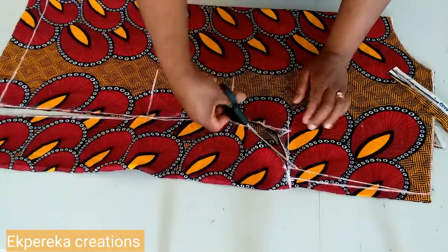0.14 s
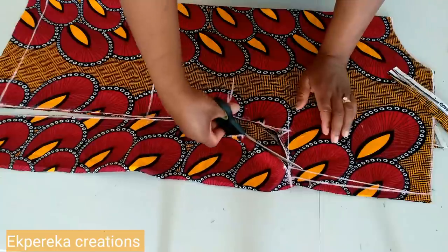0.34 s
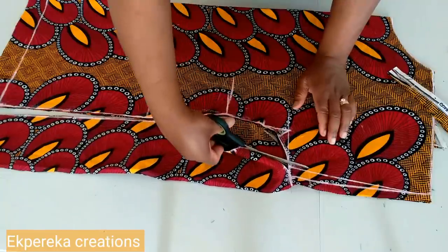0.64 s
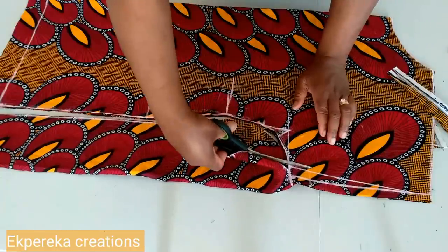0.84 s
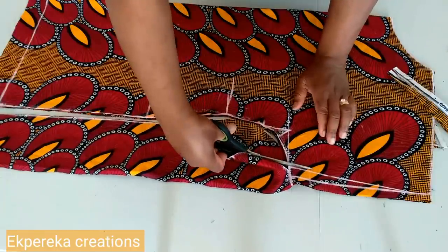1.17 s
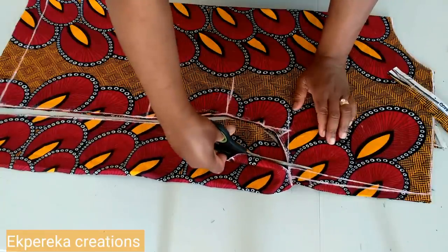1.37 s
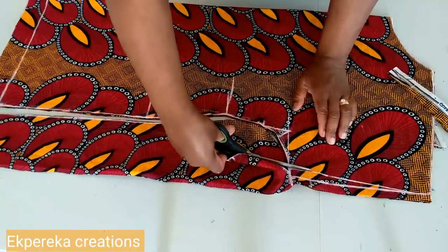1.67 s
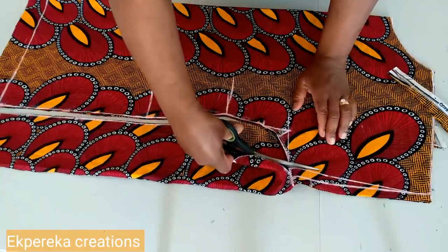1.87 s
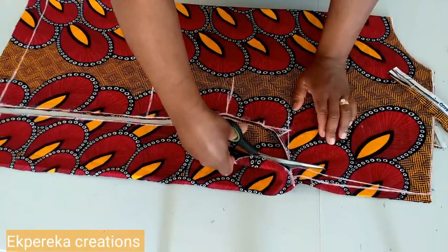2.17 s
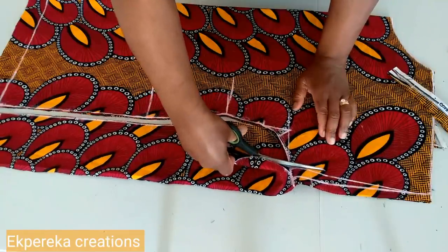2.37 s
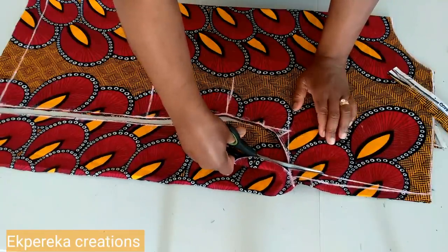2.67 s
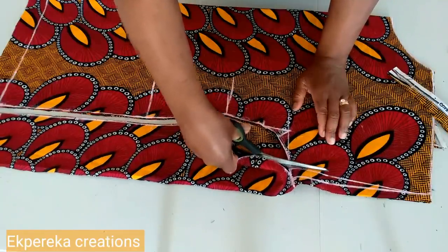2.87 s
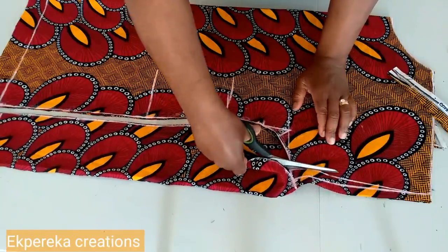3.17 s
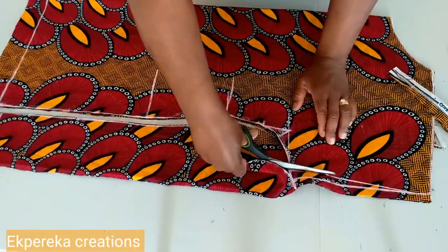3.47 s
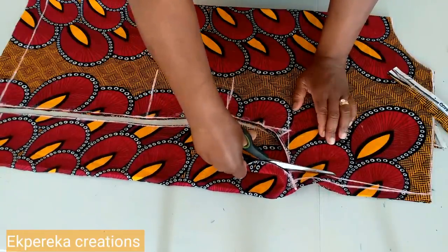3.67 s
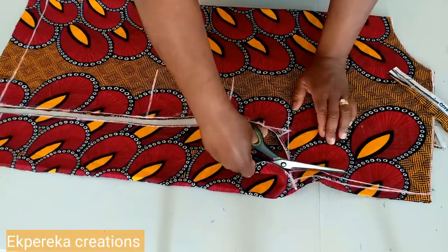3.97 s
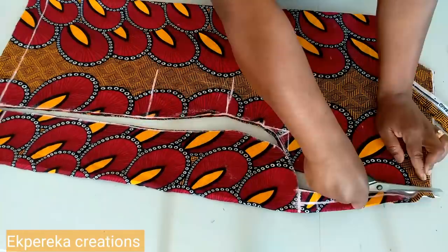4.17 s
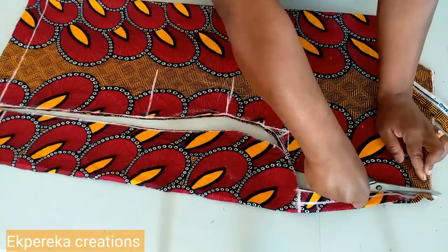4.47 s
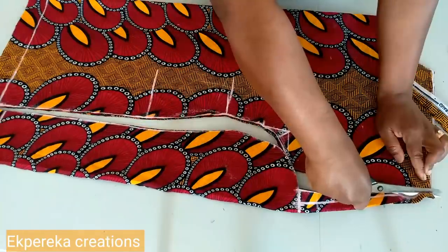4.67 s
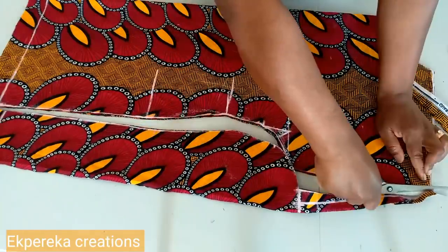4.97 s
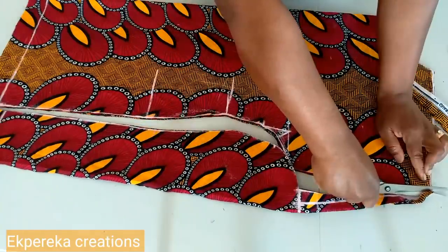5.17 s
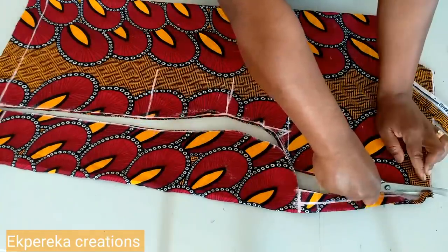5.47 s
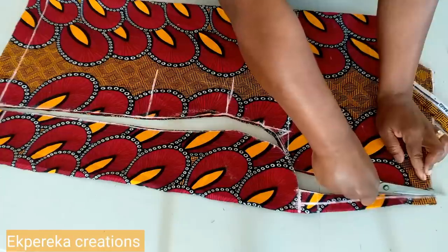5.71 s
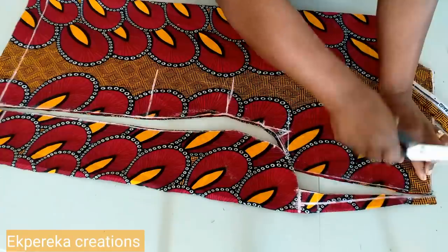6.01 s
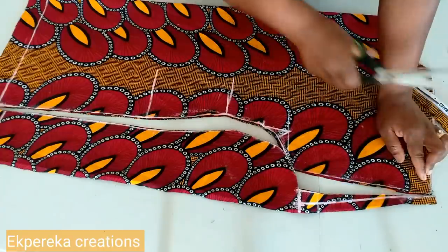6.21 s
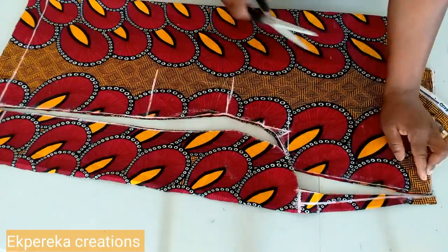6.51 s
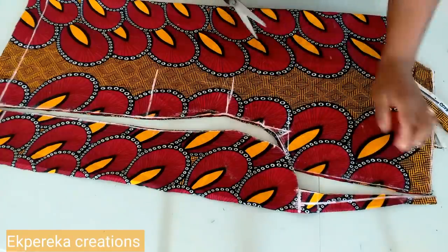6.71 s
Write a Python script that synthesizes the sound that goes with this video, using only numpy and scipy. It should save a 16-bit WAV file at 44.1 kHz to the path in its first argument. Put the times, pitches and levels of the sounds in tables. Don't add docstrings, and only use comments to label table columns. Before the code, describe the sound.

A close microphone in a bare, hard room with faint low rumble and slight hiss. For the first second there is only soft cloth brushing and a faint table tap. At about 1.3 s shears nibble, then at 1.45-1.55 s crunch through cotton with quick steel ticks and a hollow knock. Small taps follow. A second cut runs 2.5-2.75 s, grainy and metallic, ending sharply; the blades slide open with a thin, falling scrape around 2.9-3.3 s. A third cut swells to a bright snap at 3.55 s. From 4.3 to 4.55 s a thicker edge gives several thumpy crunches, with small knocks until 5.1 s. A lighter snip at 5.3 s precedes the loudest event at 5.6 s: a hard steel clack with a booming table thud and short ringing echo. After a small tick at 5.85 s, fabric sweeps and drags from 6.1 to 6.6 s with a soft low bump, then fades.

```python
import sys
import numpy as np
from scipy import signal
from scipy.fft import rfft, irfft, next_fast_len
from scipy.io import wavfile
from scipy.ndimage import uniform_filter1d, map_coordinates

SR = 44100
rng = np.random.default_rng(int(sys.argv[2]) if len(sys.argv) > 2 else 0)


def inscribe(sig):
    pcm = np.round(np.clip(np.atleast_2d(sig).T, -1, 1) * 32767)
    wavfile.write(sys.argv[1], SR, pcm.astype(np.int16))


def elevation(decibels):
    levels = np.asarray(decibels, float)
    return 10 ** (levels / 20)


N = 302085


def unit(x):
    return x / np.sqrt(np.mean(x ** 2, axis=-1, keepdims=True) + 1e-20)


def along(points, hz):
    f, v = np.transpose(points)
    return np.interp(np.log(hz + 1), np.log(f + 1), v)


def filtered(x, response):
    m = next_fast_len(x.shape[-1] + 8192)
    spectrum = rfft(x, m) * response(np.fft.rfftfreq(m, 1 / SR))
    return irfft(spectrum, m)[..., :x.shape[-1]]


def wander(step):
    draws = rng.standard_normal(int(N / step) + 4)
    return map_coordinates(draws, [np.arange(N) / step])


def rush(spectrum, patchy_db):
    z = signal.stft(rng.standard_normal(N), nperseg=512)[2]
    field = uniform_filter1d(rng.standard_normal(z.shape), size=6, axis=0)
    field = uniform_filter1d(field, size=10, axis=1)
    x = signal.istft(z * elevation(patchy_db * field / field.std()), nperseg=512)[1][:N]
    return unit(filtered(x, lambda hz: elevation(along(spectrum, hz))))


def stroke(row, shape):
    s, rise, hold, db = row[:4]
    rise_db, sag_db, release_db = shape
    t = np.arange(N) / SR - s - rise
    held = -sag_db * np.minimum(t, hold) - release_db * np.maximum(t - hold, 0)
    level = np.where(t < 0, rise_db * t / rise, held)
    return elevation(db + level) * np.clip(3 * (1 + t / rise), 0, 1)


def gain(rows, shape):
    return sum(stroke(row, shape) for row in rows)


def place(s, rows):
    out = np.zeros(N + SR)
    for at, row in zip(np.round(np.ravel(s) * SR).astype(int), rows):
        out[at:at + len(row)] += row
    return out[:N]


# f/Hz, t60/s
ROOM = [(150, 0.46), (1000, 0.32), (4000, 0.44), (8000, 0.32), (14000, 0.44)]


def tails(count):
    hz, t, z = signal.stft(rng.standard_normal((count, SR // 2)), SR, nperseg=256)
    decay = elevation(-60 * t / along(ROOM, hz)[:, None])
    tail = signal.istft(z * decay, SR, nperseg=256)[1][:, :SR // 2]
    return unit(tail) / np.sqrt(SR // 2)


# t/s (from), handle level/dB, handle ring f/Hz, table spot f/Hz
GRIP = [(0, -3, 600, 245), (1.44, 8.5, 720, 244), (1.46, 9, 1160, 250), (1.7, 15, 860, 223),
        (2.3, 0, 810, 240), (2.54, 3, 830, 265), (2.74, 13, 826, 300), (2.85, 16, 610, 310),
        (3.4, -12.5, 1040, 305), (3.47, 6, 905, 305), (3.51, 14, 900, 410), (3.54, 0, 940, 396),
        (3.7, -13, 670, 286), (4.36, -6, 650, 238), (4.47, 5, 630, 267), (4.7, 11.5, 710, 228),
        (5.3, 6, 850, 244), (5.38, -9.5, 626, 370), (5.59, 1, 900, 198), (5.8, 4, 657, 390)]


def grip(s):
    start, *cols = np.transpose(GRIP)
    return [c[np.searchsorted(start, s) - 1] for c in cols]


# f/Hz, level/dB per Hz
HISS = [(500, -34), (800, -8.5), (1100, -12), (2200, -16), (4000, -16), (6400, -22.5), (9000, -23.5),
        (13000, -20), (15600, -21), (16800, -26)]


def hiss():
    return elevation(-75.5) * rush(HISS, patchy_db=.3)


# f/Hz, level/dB per Hz
HUM = [(12, -61), (20, -25.5), (48, -10.5), (91, -11.5), (141, -1.5), (175, -12.5), (238, -1), (265, -7),
       (360, -13.5), (387, -14.5), (455, -17.5), (545, -28), (586, -21.5), (1500, -57.5), (1950, -56),
       (3300, -120)]


def rumble():
    drift = wander(SR / 6)
    return elevation(-60.5 - 1.2 * drift) * rush(HUM, patchy_db=1)


# t/s, rise/s, hold/s, peak level/dB
BRUSH = [
    (0, 0.013, 0.076, -77),
    (.08, 0.1, 0.18, -75),
    (.46, 0.17, 0.24, -75.5),
    (1.73, 0.039, 0.29, -77),
    (2.8, 0.13, 0.23, -70),
    (3.76, 0.029, 0.18, -74),
    (4.73, 0.034, 0.13, -76.5),
    (6.14, 0.12, 0.43, -63.5),
    (6.76, 0.077, 0.12, -75),
]
# f/Hz, level/dB per Hz
CLOTH = [(410, -46), (700, -23), (1010, 5), (1320, -6), (3510, -2), (8190, -1), (9220, -12), (14800, -10.5),
         (15900, -36), (16500, -57)]
# t/s, rise/s, hold/s, peak level/dB
DRAG = [
    (0, .25, .03, -61),
    (6.17, 0.13, .35, -57.5),
    (6.6, 0.02, .25, -70.5),
]
# f/Hz, level/dB per Hz
FOLD = [(350, -50), (550, -1), (750, -12), (1500, -12), (2600, -7), (4000, -6), (5200, -10), (6500, -45)]


def cloth():
    shape = (17.7, 30.8, 140)
    brush = gain(BRUSH, shape) * elevation(4) * rush(CLOTH, patchy_db=.8)
    drag = gain(DRAG, shape) * elevation(-4) * rush(FOLD, patchy_db=1.5)
    return brush + drag


def bump():
    start_s, peak_db, hz, t60_s = 6.262, -44, 80, .11
    t = np.clip(np.arange(N) / SR - start_s, 0, None)
    decay = elevation(peak_db - 60 * t / t60_s)
    return decay * np.sin(2 * np.pi * hz * t) * (1 - np.exp(-t / 0.0023))


# t/s, rise/s, hold/s, peak level/dB, resonance f/Hz
GLIDE = [
    (2.917, .06, 0.07, -73.5, 4760),
    (3.05, 0.069, 0.094, -76, 4450),
    (3.176, 0.025, 0.11, -72, 3750),
    (3.404, 0.048, .02, -60, 3900),
    (3.73, 0.019, 0.08, -73, 3950),
    (5.079, 0.011, 0.045, -78, 4630),
    (5.13, 0.025, 0.059, -79, 3880),
    (5.27, 0.028, .02, -80, 4000),
]


def glide():
    half_width_hz = 240
    shape = (7.5, 25, 160)
    noise = elevation(3 * wander(900)) * rng.standard_normal(N)

    def ringing(hz):
        return unit(filtered(noise, lambda f: 1 / (1 + ((f - hz) / half_width_hz) ** 2)))

    return sum(stroke(row, shape) * ringing(row[-1]) for row in GLIDE)


# t/s, rise/s, hold/s, peak level/dB
SHEAR = [
    (1.262, 0.015, 0.18, -61),
    (1.445, 0.02, 0.078, -34.5),
    (2.55, 0.098, 0.043, -36),
    (2.75, 0.003, 0.0017, -31),
    (3.4, 0.17, .005, -31),
    (4.196, 0.0064, 0.062, -64.5),
    (4.33, 0.017, 0.1, -51),
    (4.474, 0.005, .06, -37),
    (5.312, 0.015, 0.13, -43),
]
# f/Hz, level/dB per Hz
THREADS = [(290, -15), (500, -6.5), (605, -7.5), (1980, -14), (2260, -9), (4290, -10.5), (8420, -21.5),
           (9060, -27.5), (11600, -23.5), (14900, -31.5), (16500, -45)]


def shear():
    clumps = wander(90)
    grains = unit(elevation(4 * clumps) * rush(THREADS, patchy_db=3))
    return gain(SHEAR, (21.3, 92, 780)) * elevation(-9) * grains


# t/s, peak level/dB, boom level/dB, upper panel level/dB
KNOCKS = [(0.95, -60, -5, 3.5), (1.455, -37.5, -7.5, 8.5), (1.535, -33, -14, -10), (1.749, -50, -23, 5),
          (1.85, -47.5, -23.5, -8), (2.32, -51, -3.5, -9), (2.595, -36, -6, 0.5), (2.619, -36.5, -1, -16),
          (2.65, -46.5, -6, 12.5), (2.752, -34, -18, -11), (2.913, -47.5, -11.5, 5), (3.484, -45, -5, -14),
          (3.526, -26, -35, -1), (3.543, -24.5, -29, -9.5), (3.797, -52.5, -12, 0), (4.334, -35, -24, -5),
          (4.387, -38, -14, -2), (4.482, -22.5, -9, -18), (4.504, -30, -7, 4), (4.534, -32, -2.5, 1),
          (4.726, -47.5, -31, 9), (4.744, -35, -24, -3.5), (4.831, -39, -4, -9), (4.859, -45.5, -20.5, -12),
          (5.096, -43, -6, -13), (5.327, -36.5, -18, -3), (5.396, -39.5, -8.5, -1.5),
          (5.5992, -23.5, -11.5, -25), (5.6051, -7.5, -3, -8.5), (5.839, -38, -4, 1.5)]
# f/Hz, level/dB, t60/s
BOOM = [(69, -25, 0.56), (141.9, 4, 0.43)]
# f/Hz, level/dB, t60/s
PANEL = [(155.6, -2.5, 0.34), (192.3, -10, .35), (220.8, -3, 0.27), (249.9, 0, 0.28), (298, -1, 0.29),
         (333.5, -1.5, .25), (367.8, -2, 0.31), (367, -6.5, 0.2)]
# f/Hz, level/dB, t60/s
UPPER = [(461, -15.5, .28), (506, -3.5, 0.28), (607, -6.5, 0.38), (646, -0.5, 0.34), (770, -11, 0.42),
         (840, -0.5, 0.18), (897, -7, 0.24), (999, -10.5, .3)]


def knocks():
    s, db, boom_db, upper_db = np.transpose(KNOCKS)[:, :, None]
    spot_hz = grip(s)[-1]
    t = np.arange(SR // 2) / SR

    def ring(modes):
        return np.array([elevation(level - 60 * t / t60) * np.sin(2 * np.pi * hz * t) for hz, level, t60 in modes])

    def share(modes):
        return elevation(2 * rng.standard_normal((len(s), len(modes))))

    near = 1 + 1.2 / (1 + ((np.transpose(PANEL)[0] - spot_hz) / 45) ** 2)
    top = (near * share(PANEL)) @ ring(PANEL)
    top = top + elevation(upper_db) * (share(UPPER) @ ring(UPPER))
    onset = 1 - np.exp(-t / 0.003)
    top = top * onset * (1 + 1.6 * elevation(-60 * t / 0.024))
    top = signal.sosfilt(signal.butter(4, 130, "high", fs=SR, output="sos"), top)
    boom = elevation(boom_db + 9.0) * ring(BOOM).sum(0) * (1 - np.exp(-t / 0.0037))
    return place(s, elevation(db - 12.0) * (top + boom))


# t/s, steel peak
# level/dB, steel ring f/Hz, edge level/dB
SLIPS = [(1.271, -49, 3140, -8), (1.4, -60, 3100, -19), (1.4534, -45, 3760, 6),
         (1.4546, -29.5, 3030, -30), (1.4682, -31, 3120, -15), (1.4913, -32.5, 3630, 2),
         (1.5079, -39, 2270, -18), (1.5334, -29.5, 2280, -10), (1.5672, -38, 3430, 3.5),
         (1.7505, -53.5, 3020, -31), (1.7883, -54, 3670, -21), (2.393, -46.5, 2480, -39),
         (2.415, -45.5, 3540, -35), (2.517, -41, 2830, -9), (2.5515, -34.5, 2630, -6.5),
         (2.592, -28.5, 2470, -8), (2.6175, -28.5, 2670, -5), (2.6466, -27.5, 2560, -9),
         (2.6782, -29.5, 3530, -3.5), (2.7525, -37.5, 3730, -11), (2.8898, -52, 3670, -18),
         (2.9194, -50.5, 3570, -13), (3.4372, -36.5, 4000, -2), (3.4824, -29, 3860, -3),
         (3.5247, -30.5, 5300, 0), (3.545, -24, 3550, -12), (3.5514, -26.5, 3270, -12),
         (3.5643, -30, 5250, -23),
         (4.204, -56.5, 4520, -22), (4.305, -40.5, 4500, -8), (4.3337, -34.5, 2850, -10),
             (4.3465, -36, 4150, -14), (4.3813, -30.5, 2820, -11.5), (4.3977, -34, 3660, -8.5),
             (4.4804, -27, 1640, -10.5), (4.533, -30, 2640, -3.5), (4.7381, -47, 2720, -14),
             (5.31, -59, 4420, -12), (5.3263, -42.5, 4330, -13), (5.3946, -39, 3020, -2),
             (5.4379, -44, 4214, -5), (5.599, -28, 5010, 5), (5.604, -9, 2510, -10.5),
             (5.6292, -14.5, 3330, -6), (5.854, -41.5, 2540, -8)]
# f/Hz, level/dB per Hz
STEEL = [(880, -32.5), (1500, 3), (1710, -8), (1880, -1.5), (2280, -2), (2480, -4), (3290, -2.5),
         (4470, -3), (8000, -18.5), (10400, -38), (17600, -120)]
# f/Hz, level/dB per Hz
EDGE = [(4500, -29), (6000, -7.5), (8500, -8), (9400, -16), (10600, -10), (13500, -13.5), (15500, -18),
        (16800, -18.5)]
# f/Hz, level/dB per Hz
HANDLE = [(240, -35.5), (400, -4), (733, -6.5), (868, -1), (947, -10), (1080, -3), (2000, -12.5),
          (2600, -47), (4400, -120)]


def slips():
    s, steel_db, steel_hz, edge_db = np.transpose(SLIPS)[:, :, None]
    handle_db, handle_hz, _ = grip(s)
    t = np.arange(SR // 2) / SR
    knots = rng.standard_normal((len(s), 120))
    blade_hz = np.array([1600, 2600, 2950, 3150, 3700, 4280, 4700, 5300])[:, None]
    woken = 1.6 * rng.random((len(s), len(blade_hz))) * (steel_db < -24)
    rise_s = .0028 * elevation(-.35 * np.minimum(steel_db + 25, 0))

    def ripple(f):
        return elevation(2 * np.array([np.interp(f, np.linspace(0, SR / 2, 120), k) for k in knots]))

    def ring(f, centre, q, lift):
        return 1 + lift / (1 + ((f - centre) * q / centre) ** 2)

    def pivot(f):
        return elevation(np.minimum(steel_db + 30.5, 0) * np.exp(-((f - 1710) / 460) ** 2))

    def blade(f):
        return 1 + woken @ (1 / (1 + ((f - blade_hz) / 70) ** 2))

    def steel(f):
        return ripple(f) * blade(f) * pivot(f) * elevation(along(STEEL, f)) * ring(f, steel_hz, 22, 2.6)

    def edge(f):
        return ripple(f) * elevation(along(EDGE, f))

    def handle(f):
        return elevation(along(HANDLE, f)) * ring(f, handle_hz, 6.8, 2.4)

    def fade(t60):
        return elevation(-60 * t / t60) * (1 - np.exp(-t / rise_s))

    parts = [(steel, 0, fade(0.069) + 1.5 * fade(0.016)),
             (edge, edge_db, fade(.045) + 1.4 * fade(0.011)),
             (handle, handle_db, fade(0.05) + 2.11 * fade(0.015))]
    echo = tails(count=len(s)) * (1 - np.exp(-(t / 0.01) ** 2))
    out = np.zeros((len(s), len(t)))
    for colour, db, shape in parts:
        burst = shape * unit(filtered(rng.standard_normal(out.shape), colour))
        energy = np.sqrt(np.mean(shape ** 2, axis=-1, keepdims=True))
        answer = elevation(-2.5) * energy * unit(filtered(echo, colour))
        out += elevation(steel_db + db - 7.0) * (burst + answer)
    return place(s, out)


def scene():
    background = cloth() + rumble() + hiss()
    rub = glide() + shear()
    echo = signal.fftconvolve(rub, tails(count=1)[0])[:N]
    return (background + bump() + rub + elevation(3.0) * echo + knocks() + slips())[None]


def band_limit(x):
    return signal.sosfilt(signal.butter(12, 16830, fs=SR, output="sos"), x)


def record(dry):
    heard = signal.sosfilt(signal.butter(2, 45, "high", fs=SR, output="sos"), dry)
    limited = signal.sosfilt(signal.ellip(8, .5, 50, 15620, fs=SR, output="sos"), heard)
    mix = limited + elevation(-24.0) * (heard - limited)
    return band_limit(mix)


dry = scene()
out = record(dry)
inscribe(out)
```